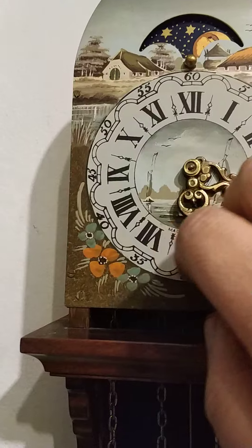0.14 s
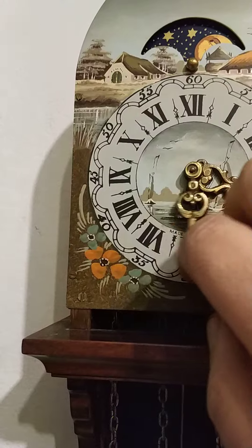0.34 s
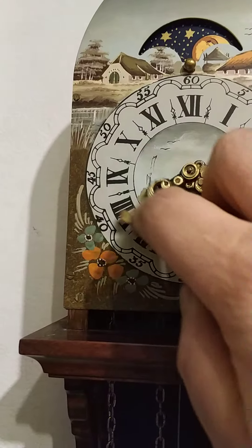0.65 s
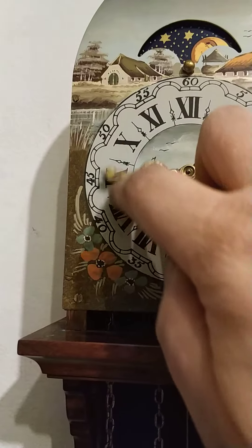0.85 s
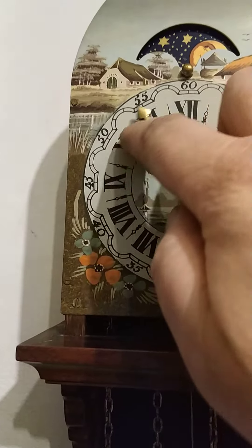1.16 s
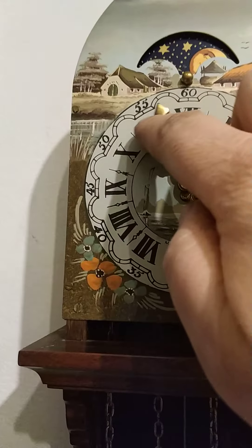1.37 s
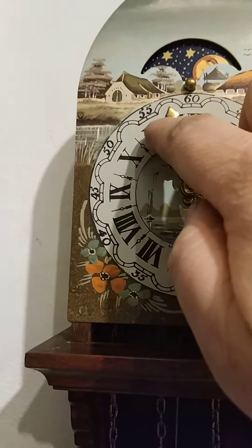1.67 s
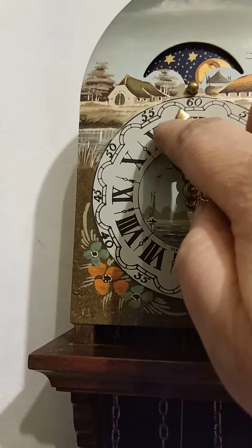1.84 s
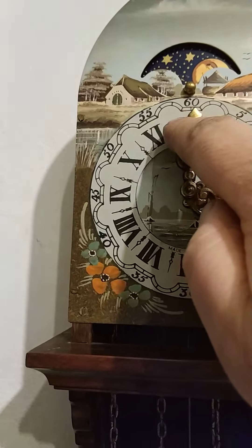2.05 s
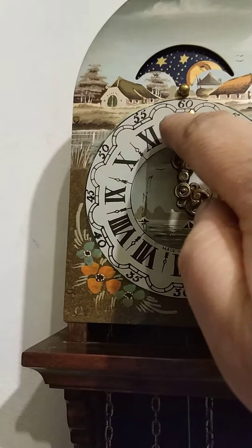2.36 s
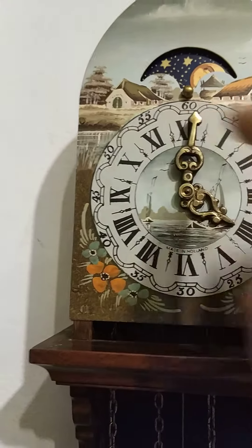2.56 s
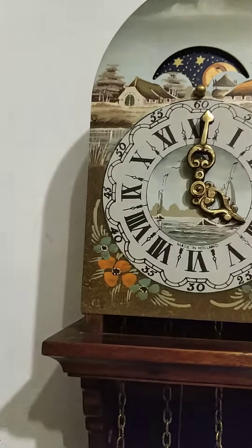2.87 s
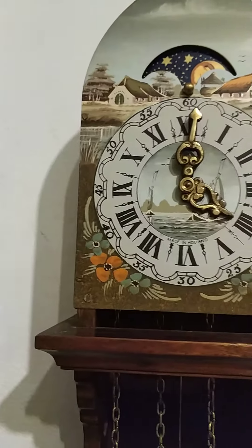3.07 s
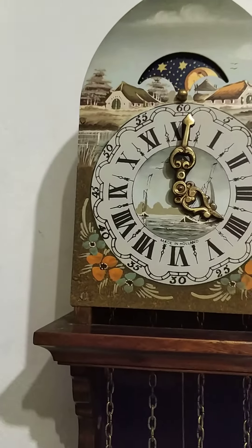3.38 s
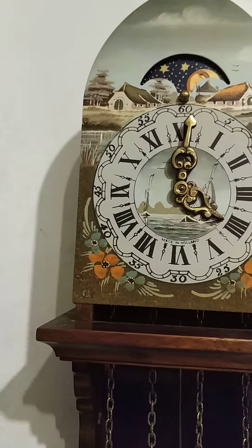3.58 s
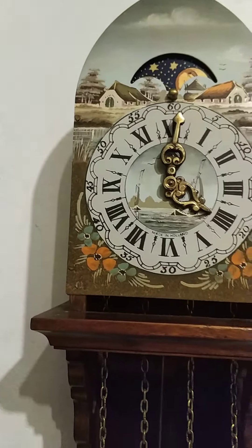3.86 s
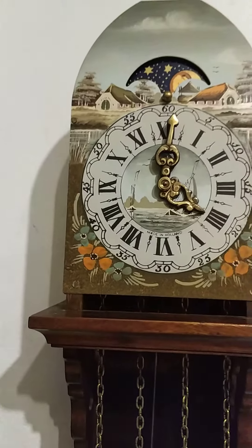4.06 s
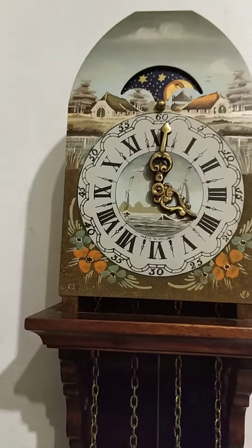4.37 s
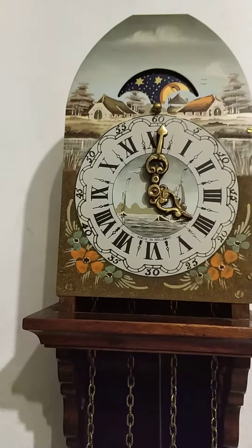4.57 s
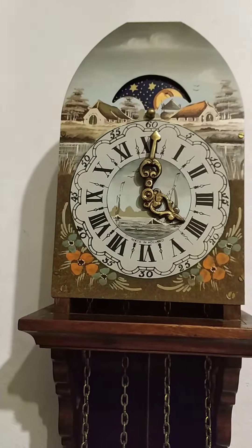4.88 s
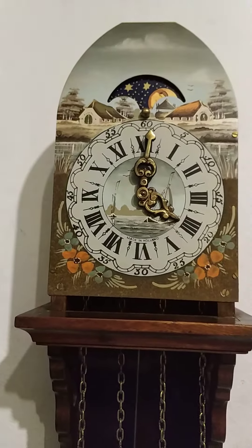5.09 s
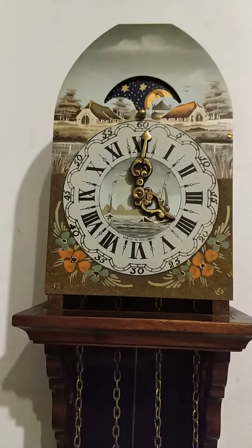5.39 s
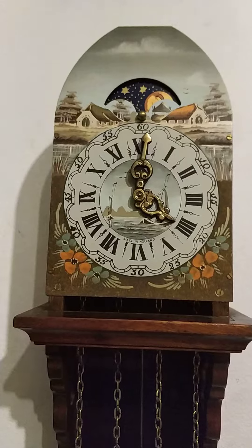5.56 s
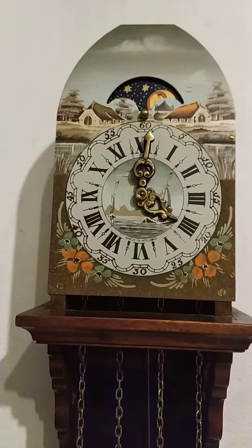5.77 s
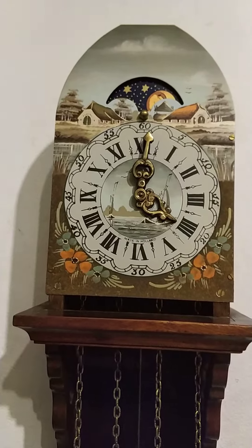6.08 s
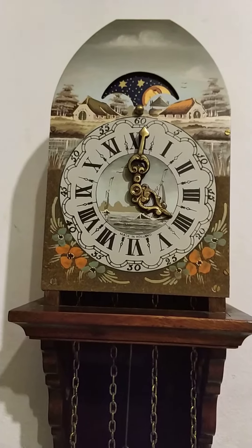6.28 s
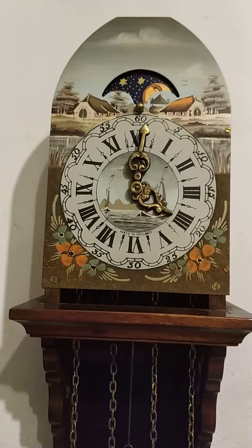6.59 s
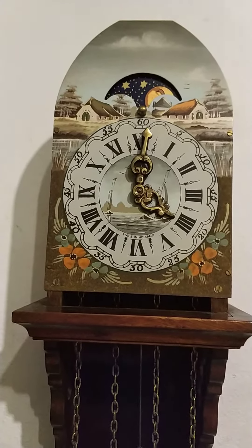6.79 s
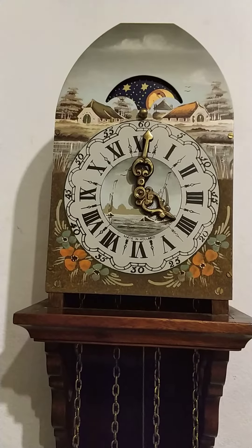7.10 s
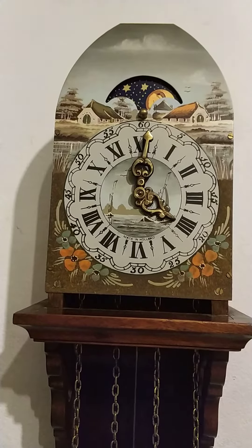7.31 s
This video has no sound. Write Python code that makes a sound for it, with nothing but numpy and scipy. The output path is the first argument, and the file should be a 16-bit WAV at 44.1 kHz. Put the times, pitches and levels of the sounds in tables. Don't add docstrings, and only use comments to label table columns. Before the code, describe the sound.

Close, slightly thin, bass-light sound of a mechanical clock indoors: steady dry ticks, soft finger rubs and a pulsing leftover bell hum. Several lever clicks precede a bouncing metallic rattle, then a fine brassy whirr builds, slackening before each blow. The hammer cracks on a high bell three times with tiny rebounds, leaving beating tones over faint room hush and distant ticking.

```python
import sys
import numpy as np
from scipy import signal
from scipy.fft import rfft, irfft
from scipy.io import wavfile
from scipy.ndimage import uniform_filter1d

SR = 44100
rng = np.random.default_rng(int(sys.argv[2]) if len(sys.argv) > 2 else 0)


def wav_record(signal):
    frames = np.transpose(np.atleast_2d(signal))
    bounded = np.clip(frames, -1, 1)
    quanta = np.round(bounded * 32767).astype(np.int16)
    wavfile.write(sys.argv[1], SR, quanta)


def field_ratio(decibels):
    return 10 ** (np.asarray(decibels, dtype=float) / 20)


N = 328104

STRIKES_S = [3.669, 5.168, 6.633]
FAR_SWING_S, FAR_DB_PER_S = 1.228, 0.5


def seconds():
    return np.arange(N) / SR


def band(x, lo_hz, hi_hz):
    return signal.sosfilt(signal.butter(2, [lo_hz, hi_hz], "bandpass", fs=SR, output="sos"), x)


def coloured(points):
    hz, db = np.transpose(points)
    bins = np.maximum(np.arange(N // 2 + 1) * SR / N, 1)
    gain = field_ratio(np.interp(np.log(bins), np.log(hz), db))
    x = irfft(rfft(rng.standard_normal(N)) * gain, N)
    return x / x.std()


def ring(x, modes):
    out = 0
    for k, (hz, db, t60) in enumerate(modes):
        pole = np.exp(2j * np.pi * hz / SR - np.log(1000) / (t60 * SR))
        out = out + (-1) ** k * field_ratio(db) * signal.lfilter([1], [1, -pole], x).imag
    return out


def jolts(times, dbs, decay, rise=0.0015):
    impulses = np.zeros(N)
    np.add.at(impulses, (np.asarray(times) * SR).astype(int), field_ratio(dbs))
    swell = np.exp(-1 / (rise * SR))
    fade = np.exp(-1 / (decay * SR))
    return signal.lfilter([1 - swell], np.convolve([1, -swell], [1, -fade]), impulses)


def scuff(times, dbs, decay):
    return jolts(times, dbs, decay) * rng.standard_normal(N) * np.sqrt(2 / (decay * SR))


def dips(rows):
    t = seconds()
    return np.prod([1 - min(lost, 1) * np.exp(-((t - s) / width) ** 2) for s, width, lost in rows], axis=0)


def swings(rows, swing_s, db_per_s, fixed_columns=0):
    out = []
    for s, *rest in rows:
        for late in np.arange(-swing_s, N / SR, swing_s):
            if 0 < s + late < N / SR:
                levels = np.add(rest[fixed_columns:], db_per_s * late)
                out.append((s + late, *rest[:fixed_columns], *levels))
    return out


def hush():
    # (frequency [Hz], density [dB per Hz])
    room_spectrum = [(40, -53), (130, -27), (220, -14.5), (800, -24), (1500, -19.5), (3000, -28.5),
                     (8700, -30), (10800, -46)]
    waver = uniform_filter1d(np.repeat(rng.standard_normal(N // 2048 + 1), 2048), 2048)[:N]
    tone = field_ratio(-69) * coloured(room_spectrum)
    low = band(tone, 200, 1600)
    return tone + low * (field_ratio(3.7 * waver) - 1)


def room(x, t60=0.21, wet_db=-9):
    t = np.arange(SR // 2) / SR
    tail = rng.standard_normal(len(t)) * np.exp(-np.log(1000) * t / t60)
    tail = tail * (t > .006)
    return x + field_ratio(wet_db) * signal.fftconvolve(x, tail / np.sqrt(np.sum(tail ** 2)))[:N]


def brushes():
    # (time [s], centre [Hz], length [s], level [dB])
    rubs = [(0.007, 5700, 0.043, -63.5), (0.12, 500, 0.052, -63), (0.133, 328, .06, -69.5),
            (0.337, 1570, 0.036, -65), (0.457, 340, 0.058, -69.5), (.523, 5650, .04, -71),
            (.9, 5650, .035, -70), (1.39, 5630, .04, -72), (1.667, 5600, 0.031, -71),
            (.9, 2200, 0.034, -69), (.9, 3780, .03, -66), (0.945, 753, 0.063, -68),
            (1.172, 5630, 0.031, -63), (1.235, 4500, 0.12, -65), (1.392, 454, 0.056, -70.5),
            (1.486, 2900, 0.036, -52), (1.49, 2500, 0.048, -57), (1.673, 1540, 0.036, -60.5),
            (1.877, 5630, 0.031, -69), (1.098, 4430, 0.029, -69), (2.293, 744, 0.031, -61.5),
            (2.372, 460, 0.065, -70), (3.364, 460, 0.085, -69), (3.485, 1050, 0.025, -67)]
    # (first time [s], centre [Hz], length [s], level [dB])
    far_case = [
        (.6, 2310, .04, -64.5),
        (.6, 4580, .065, -68.5),
        (.615, 829, 0.074, -65),
        (1.2, 846, 0.063, -71),
    ]
    out, noise, t = np.zeros(N), rng.standard_normal(N), seconds()
    for s, hz, length, db in rubs + swings(far_case, FAR_SWING_S, FAR_DB_PER_S, fixed_columns=2):
        near = slice(max(int((s - .2) * SR), 0), int((s + 0.11) * SR))
        rub = band(noise[near], hz * .978 - 30, hz * 1.022 + 30)
        out[near] += field_ratio(db) * rub / rub.std() * np.exp(-((t[near] - s) / (length / 2)) ** 2)
    return out


def other_clocks():
    # (first time [s], plates [dB], dull [dB], bright [dB], edge [dB])
    slow_clock = [
        (.3245, -51, -68, -76, -73),
        (.347, -53.5, -70.5, -76, -81),
        (.936, -54, -65.5, -69.5, -79),
        (.955, -57, -61.5, -68.5, -81),
    ]
    far_clock = [
        (.586, -56, -65.5, -57.5, -74),
        (.617, -77, -79, -61, -72.5),
        (1.168, -59, -70, -58, -71),
        (1.199, -53, -68, -67.5, -73),
    ]
    slow = swings(slow_clock, 1.3327, 1.02)
    return slow + swings(far_clock, FAR_SWING_S, FAR_DB_PER_S)


def clicks():
    # (time [s], plates [dB], bright [dB])
    tick_rows = [(0.4206, -38.5, -40.5), (1.0, -37.5, -40.5), (1.5962, -40, -43), (2.168, -38.5, -41),
                 (2.7863, -41.5, -55), (3.3567, -38.5, -47), (3.93, -39, -58), (4.541, -41.5, -47.5),
                 (5.715, -43, -46), (6.3159, -42.5, -50), (6.8903, -40.5, -47)]
    rack_rows = [
        (2.0198, -36.5, -30),
        (2.025, -37, -33),
        (2.0374, -50, -42),
        (2.0509, -35.5, -28.5),
        (2.0657, -45, -37),
        (2.079, -38, -41),
        (2.0936, -52, -38),
        (2.101, -55, -45),
        (2.11, -44, -46),
        (2.1234, -53, -56),
    ]
    # (time [s], plates [dB], dull [dB], bright [dB], edge [dB])
    levers = [(.1117, -51.5, -62, -71, -77), (0.399, -49, -72, -60, -72), (.8859, -59, -81, -66, -70),
              (1.3087, -40, -53, -41.5, -50), (1.4483, -32.5, -63, -40.5, -63.5),
              (1.4804, -48, -66, -71, -79), (3.319, -57, -64, -65, -68), (3.715, -48, -53.5, -67, -56),
              (3.9786, -57, -62.5, -60, -63), (4.638, -66, -65.5, -49, -58), (6.8008, -42, -71, -76, -62),
              (7.194, -65, -69, -51, -64)]
    slips = [
        (5.161, -64, -47.5, -37, -57),
        (6.63, -47, -46, -30.5, -45),
        (2.015, -43, -70, -50, -76),
        (3.656, -30, -55.5, -51, -51.5),
        (5.143, -35.5, -58, -57.5, -78.5),
        (5.155, -38, -59, -59.5, -68.5),
        (6.622, -46, -60.5, -60, -45),
    ]
    ticks = [(s, db, db - 18, bright_db, bright_db - 15) for s, db, bright_db in tick_rows]
    rack = [(s, db, max(db, bright_db) - 20, bright_db, bright_db - 23) for s, db, bright_db in rack_rows]
    return ticks + rack + levers + slips


def movement():
    # (frequency [Hz], level [dB], fade by 60 dB [s])
    dull = [(784, -13, 0.072), (892, -1, 0.067), (1004, -0.5, 0.015)]
    plates = [(1590, 1, 0.014), (1734, 0, 0.046), (2330, -15, 0.01), (2620, -17, 0.042)]
    bright = [(3303, 10, 0.02), (4240, -2.5, 0.047), (4000, -12.5, 0.015), (5740, -12, .02)]
    s, plate_db, dull_db, bright_db, edge_db = np.transpose(clicks() + other_clocks())
    out = ring(scuff(s, dull_db + 6.5, 0.0082), dull)
    out = out + ring(scuff(s, plate_db - 4.0, 0.0092), plates)
    out = out + ring(scuff(s, bright_db, 0.0004), bright)
    # level [dB], lowest and highest pitch [Hz], decay [s]
    for db, lo_hz, hi_hz, decay in [(dull_db + 10.5, 500, 1200, .008),
                                    (plate_db + 1, 1500, 3200, .004),
                                    (bright_db + 11.0, 3100, 5300, .0025),
                                    (edge_db + 11.5, 5600, 10500, .003)]:
        force = jolts(s, db, decay) + jolts(s, db - 17, 6 * decay)
        thicket = force * rng.standard_normal(N)
        out = out + band(band(thicket, lo_hz, hi_hz), lo_hz, hi_hz)
    return out


def chatter():
    chance = rng.random((2, N))
    sizes = field_ratio(np.minimum(-3.0 * np.log(1 - chance[1]), 11))
    grains = (chance[0] < 1500 / SR) * sizes
    surge = uniform_filter1d(np.repeat(rng.standard_normal(N // 3000 + 1), 3000), size=3000)[:N]
    return signal.lfilter([1], [1, -.99], grains) * rng.standard_normal(N) * field_ratio(1.5 * surge)


def train():
    # (frequency [Hz], width [Hz], level [dB])
    gears = [(1712, 82, -5.5), (2250, 9, -16), (3380, 78, -0.5), (4345, 200, 4), (4800, 61, -12.5),
             (5440, 260, -5), (6250, 97, -11.5), (7340, 290, -18.5), (8360, 87, -25), (9420, 80, -9.5)]
    # (time [s], width [s], share lost)
    lifts = [
        (3.43, 0.24, .78),
        (5.05, 0.34, 0.66),
        (6.48, 0.3, 0.82),
    ]
    release_s, spin_up_s, start_db, run_db = 2.166, 0.63, -68.5, -60.5
    body = sum(ring(chatter(), [(hz, db + 10 * np.log10(width), 2.3 / width)]) for hz, width, db in gears)
    rub = band(chatter(), 1400, 3000) + band(chatter(), 3300, 6500)
    spin = (seconds() - release_s) / spin_up_s
    speed_db = start_db + (run_db - start_db) * np.clip(spin, 0, 1)
    running = (spin > 0) * field_ratio(speed_db) * dips(lifts)
    return running * (field_ratio(4.0) * body / body.std() + field_ratio(-3) * rub / rub.std())


def hammer():
    # (time [s], crack peak [dB], thud in the case [dB])
    blows = [
        (3.669, -16, -41.5),
        (3.681, -24, -36.5),
        (3.699, -35.5, -46.5),
        (5.168, -16.5, -37.5),
        (5.183, -36.5, -55.5),
        (5.199, -33.5, -60),
        (6.634, -15.5, -36.5),
        (6.651, -29, -41.5),
        (6.669, -25.5, -44.5),
    ]
    # (frequency [Hz], level [dB], fade by 60 dB [s])
    rim = [(1319, -16, 0.028), (1720, -15, 0.039), (2310, -15, 0.0092), (4550, -11, 0.017),
           (6150, -7, 0.027), (9200, -14, 0.069)]
    case = [(247, -16, 0.11), (304.6, -13, 0.65), (375.7, -2, 0.33), (471.6, 6.5, 0.066),
            (538.3, 3.5, 0.088), (516.5, -23.5, 2.2), (730, -23, .06)]
    # (frequency [Hz], density [dB per Hz])
    crack_spectrum = [(150, -51.5), (600, -9), (1800, -9), (4500, -2), (8500, -4), (10500, -5.5),
                      (14000, -44)]
    s, crack_db, thud_db = np.transpose(blows)
    force = jolts(s, crack_db - 5.5, 0.003, 0.011) + jolts(s, crack_db - 27.5, 0.0037, 0.0044)
    crack = force * coloured(crack_spectrum)
    push = jolts(s, thud_db - 26.5, 0.00031, 0.000098)
    return crack + ring(scuff(s, crack_db - 0.5, 0.0039), rim) + ring(push, case)


def pair(rows, starts, beat_hz, swap=.004):
    t, out = seconds(), 0
    ends = starts[1:] + [t[-1] + 1]
    for (low_db, high_db, low_fade, high_fade, crest), start, end in zip(rows, starts, ends):
        gate = np.clip((t - start) / swap + .5, 0, 1) * np.clip((end - t) / swap + .5, 0, 1)
        age = np.maximum(t - start, 0)
        low = field_ratio(low_db - low_fade * age)
        high = field_ratio(high_db - high_fade * age) * np.exp(2j * np.pi * beat_hz * (age - crest))
        out = out + gate * (low + high)
    return out


def clang(fade, rise, *dbs):
    ages = [np.maximum(seconds() - s, 0) for s in STRIKES_S]
    return sum(field_ratio(db - fade * age) * (1 - np.exp(-age / rise)) for db, age in zip(dbs, ages))


def bell():
    # (low tone [dB], high tone [dB], low fade [dB/s], high fade [dB/s], beat crest after jolt [s])
    hum = [
        (-58.5, -61, 0.6, 1.5, 0.03),
        (-47.4, -51.1, 4.3, 2.4, .162),
        (-38.1, -46.2, 8.5, 0.9, .015),
        (-50.2, -39.8, 1.6, 3.8, .165),
        (-51.5, -43.2, 1.3, 4.9, .147),
    ]
    second_early = [
        (-37, -90, 9.6, 9, 0),
        (-59, -90, 100, 9, 0),
    ]
    second = [
        (-38.3, -53.4, 6.4, 4.4, 0.576),
        (-48.8, -28.8, 0.0, 62.8, 0.252),
        (-49.6, -28.9, 2.1, 81.6, -0.274),
    ]
    third = [
        (-23, -39, 25, 6.3, -.111),
        (-26.8, -17.4, 17.5, 26.6, -.097),
        (-30, -27.5, 22, 28, -.084),
    ]
    top = [
        (-8.0, -9.4, 73.9, 72.8, -0.244),
        (-20.1, -16.5, 66.7, 102.3, -0.109),
        (-24.4, -13.1, 58.1, 200.0, -0.127),
    ]
    # (time [s], width [s], share lost)
    second_dips = [(0, .33, .42), (3.699, .003, .9), (4.682, .09, .4), (5.11, .05, .5), (5.178, .004, .95),
                   (5.199, .005, .87), (5.635, .05, .6), (5.8, .09, -.3), (6.0, .07, .85), (6.22, .16, .96),
                   (6.4, .15, .3), (6.643, .003, .95), (6.667, .006, .76), (7.34, .04, -.4)]
    third_dips = [(3.67, .008, .97), (3.74, .04, -.3), (3.8, .03, .65), (3.88, .05, -.6), (4.0, .04, .93),
                  (4.45, .27, .28), (5.177, .003, .6), (5.192, .011, .9), (6.633, .003, .8),
                  (6.649, .003, .6), (6.679, .005, .79)]
    top_dips = [(3.69, .011, .99), (3.886, .199, .807), (5.172, .006, .3), (5.2, .02, -.15),
                (5.405, .02, .7), (5.5, .06, -.3), (6.632, .005, .8), (6.659, .009, .62), (6.69, .02, .25),
                (6.76, .04, -.3), (6.95, .15, .15)]
    # (fade [dB/s], rise [s], first strike [dB], second strike [dB], third strike [dB])
    clangs = [
        (488, .0024, -20.5, -28.8, -29.3),
        (1200, .002, -32.4, -14.5, -60),
        (1430, .005, -8, -24, -12.5),
    ]
    hum_hz, hum_beat_hz, rack_s = 1319.79, 5.73, 2.06
    t, jolted = seconds(), [0, rack_s] + STRIKES_S
    beat = ((t - hum[0][-1] - .024) * hum_beat_hz + .5) % 1 - .5
    graze = np.where(t < rack_s, field_ratio(2.0) * (1 - 0.82 * np.exp(-(beat / 0.051) ** 2)), 1)
    out = graze * pair(hum, jolted, hum_beat_hz) * np.exp(2j * np.pi * hum_hz * t)
    upper = [(3399.9, pair(second_early + second, jolted, 1.79), second_dips),
             (5965.8, pair(third, STRIKES_S, 3.52), third_dips),
             (8907.6, pair(top, STRIKES_S, 1.742), top_dips)]
    for (hz, ringing, notches), first in zip(upper, clangs):
        size = np.hypot(np.abs(ringing) * dips(notches), clang(*first))
        out = out + size * np.exp(1j * (2 * np.pi * hz * t + np.angle(ringing)))
    return out.real


def scene():
    knocks = brushes() + movement() + train() + hammer()
    return (hush() + room(knocks) + bell())[None]


def masked(x, reach_db=-37.0, size=1024):
    z = signal.stft(x, nperseg=size)[2]
    power = uniform_filter1d(np.abs(z) ** 2, size=9, axis=1)
    shadows = [field_ratio(-.5 * k if k > 0 else 1.2 * k) * np.roll(power, k, axis=1) for k in range(-16, 60, 4)]
    shadow = np.max(shadows, axis=0)
    treble = (np.arange(size // 2 + 1) * SR / size > 3000)[:, None]
    hidden = treble & (power < field_ratio(reach_db) ** 2 * shadow)
    return signal.istft(z * ~hidden, nperseg=size)[1][:, :N]


def band_limit(x):
    return signal.sosfilt(signal.butter(12, 11160, fs=SR, output="sos"), x)


def record(dry):
    x = signal.sosfilt(signal.butter(2, 150, "highpass", fs=SR, output="sos"), dry)
    x = signal.sosfilt(signal.butter(10, 10500, fs=SR, output="sos"), x)
    mix = masked(x)
    return band_limit(mix)


dry = scene()
out = record(dry)
wav_record(out)
```